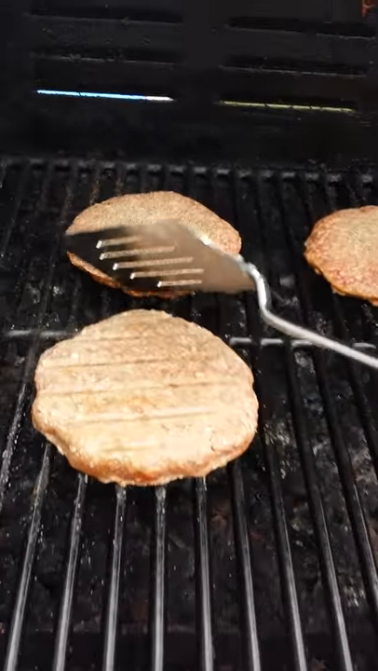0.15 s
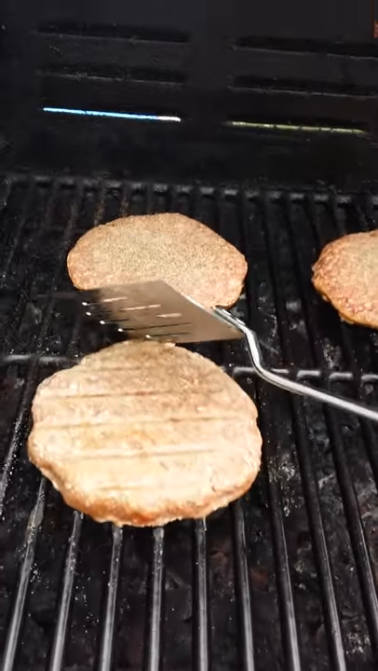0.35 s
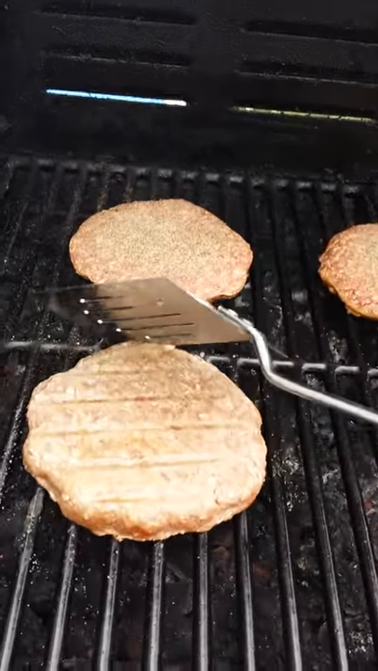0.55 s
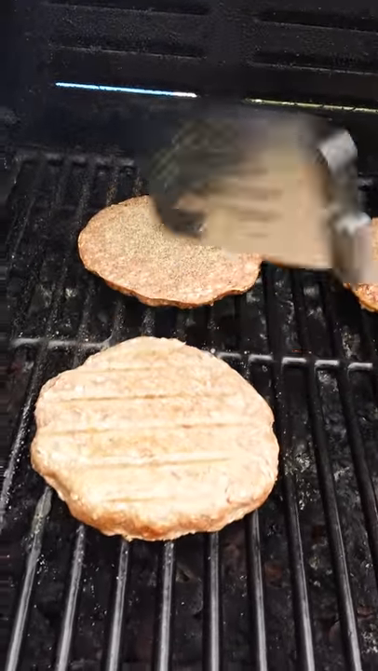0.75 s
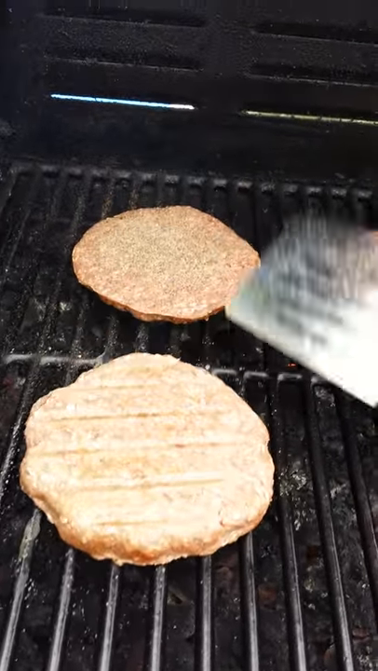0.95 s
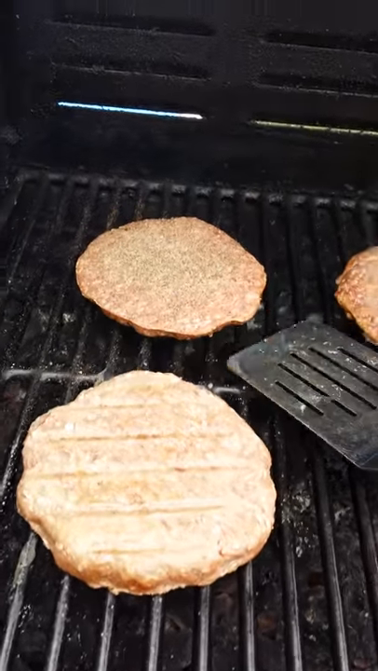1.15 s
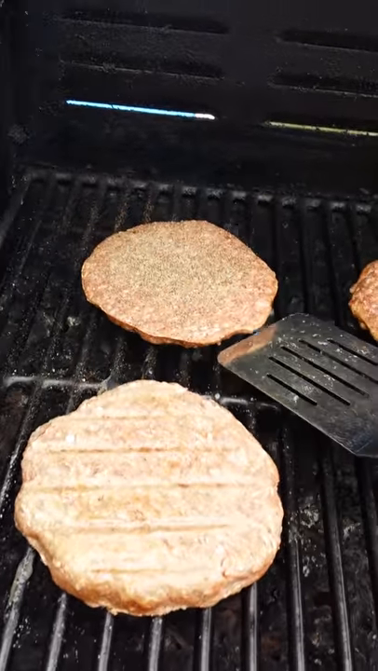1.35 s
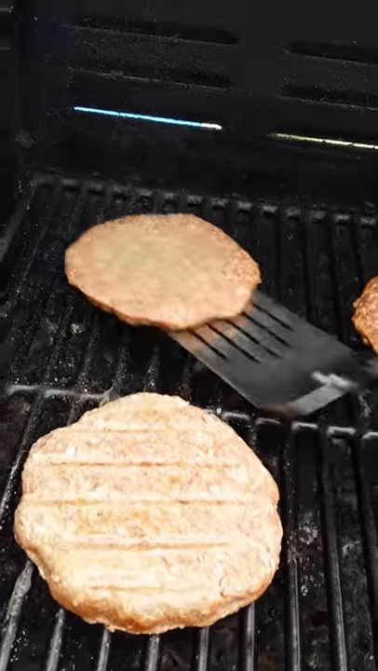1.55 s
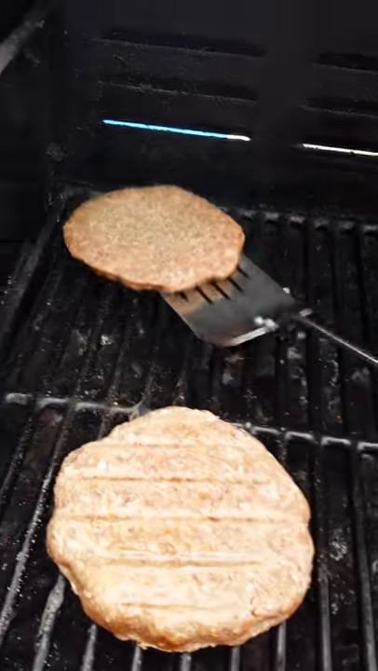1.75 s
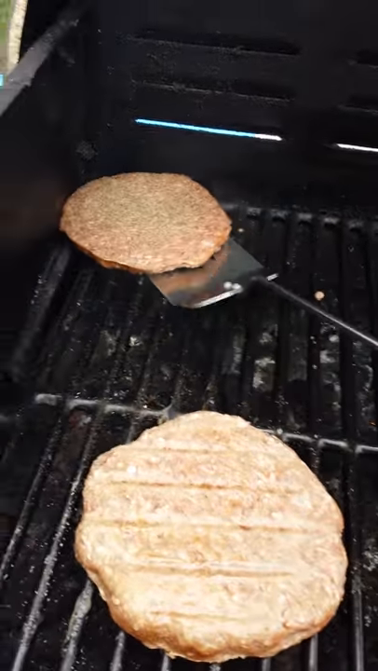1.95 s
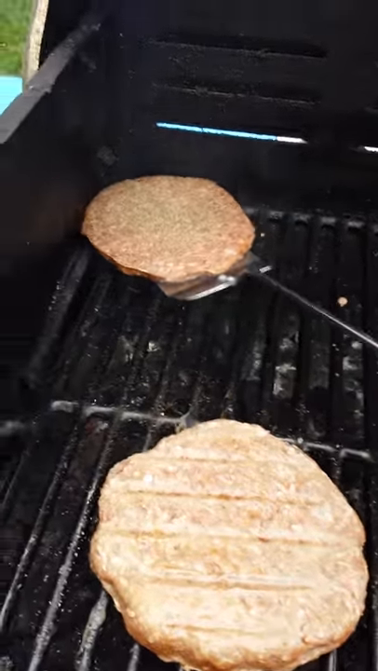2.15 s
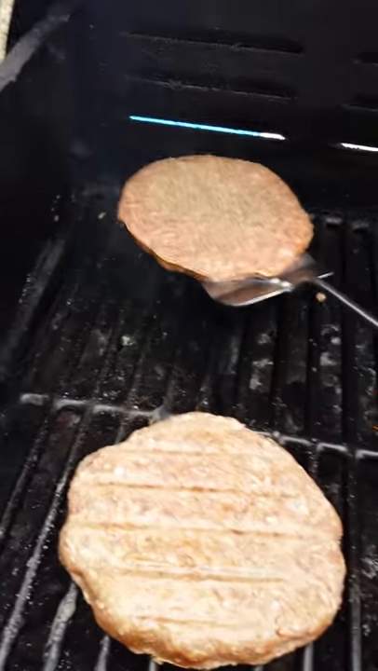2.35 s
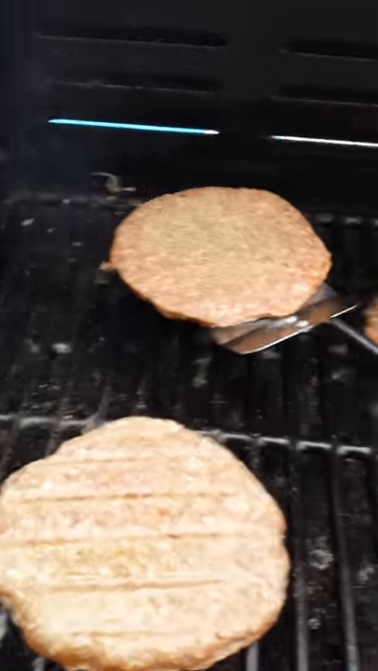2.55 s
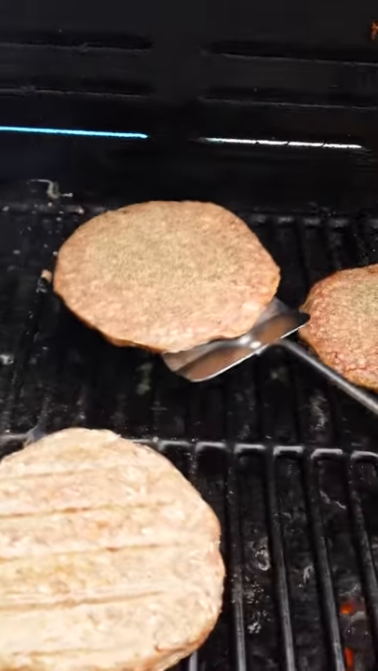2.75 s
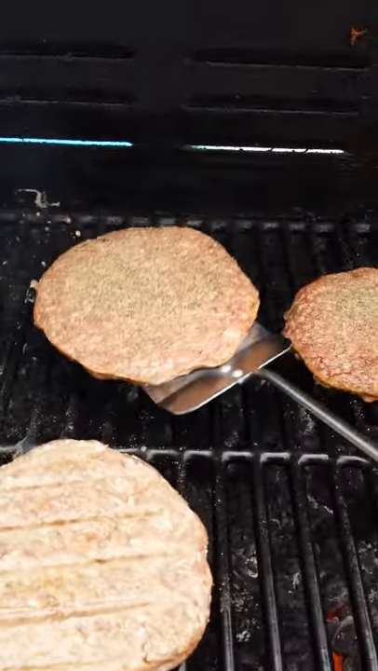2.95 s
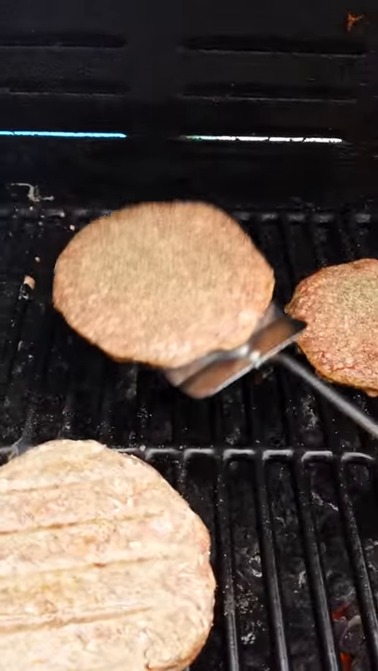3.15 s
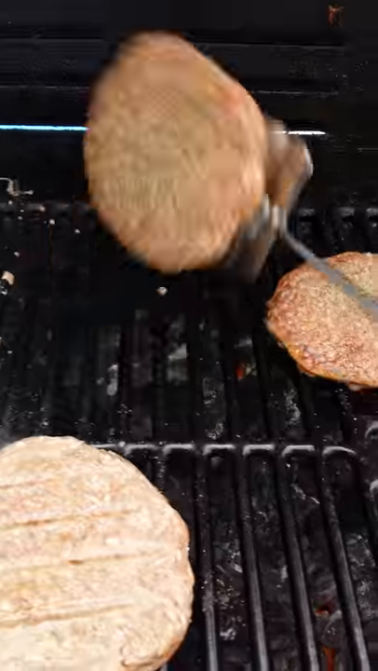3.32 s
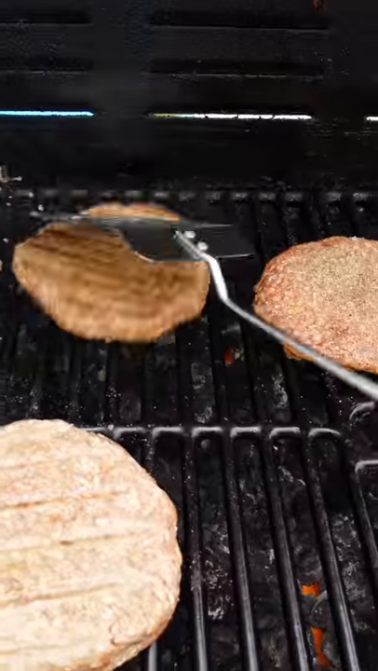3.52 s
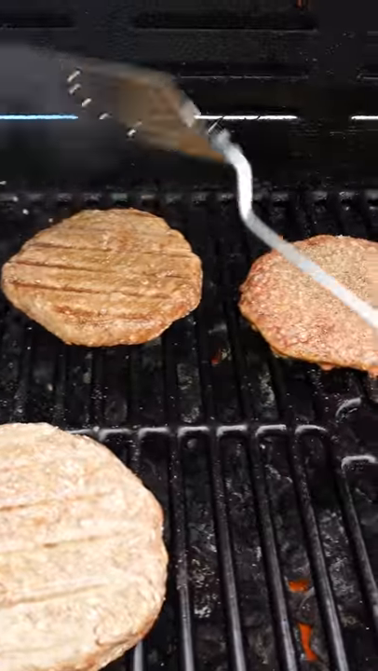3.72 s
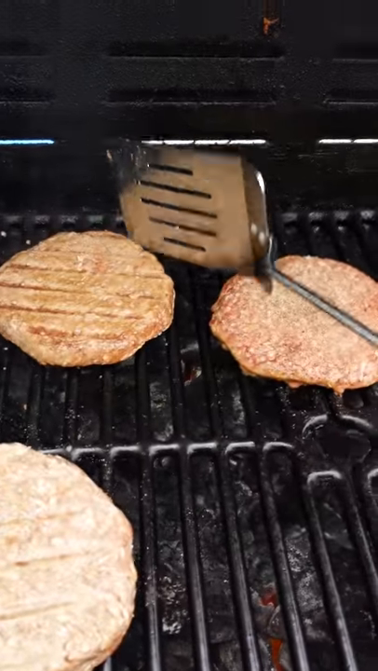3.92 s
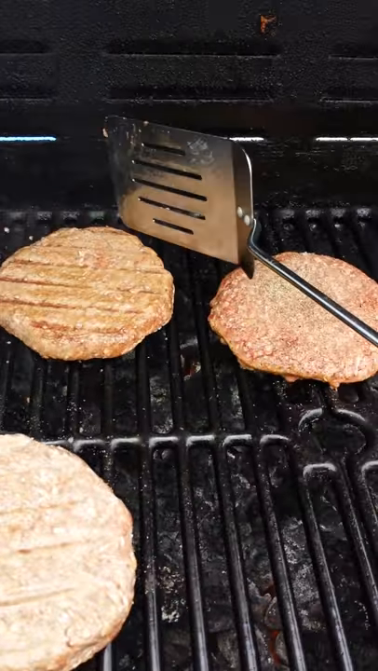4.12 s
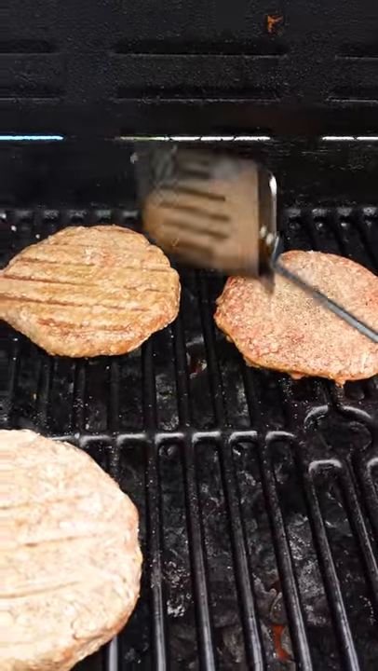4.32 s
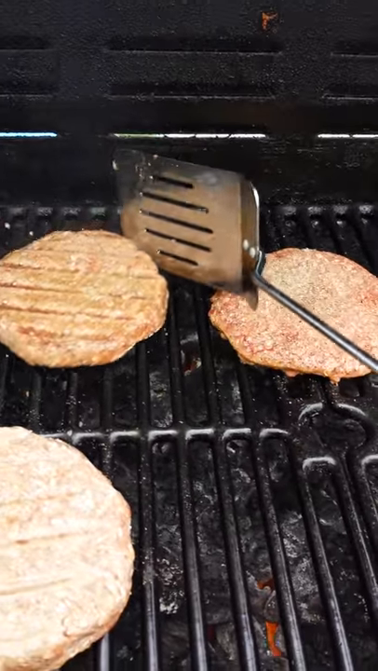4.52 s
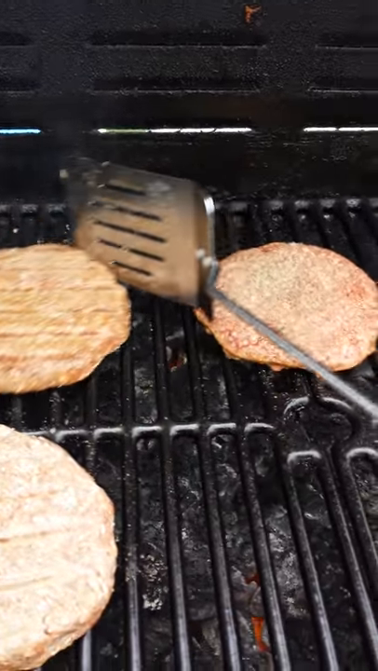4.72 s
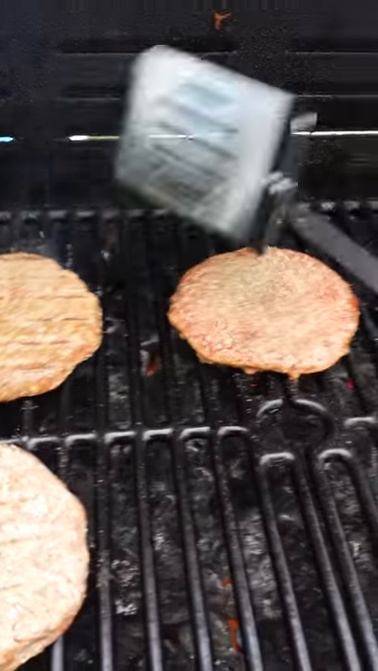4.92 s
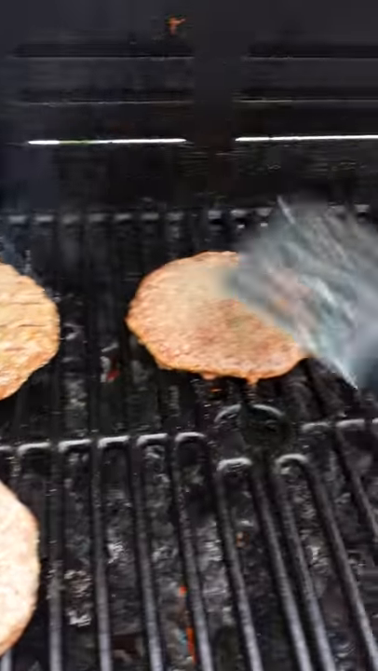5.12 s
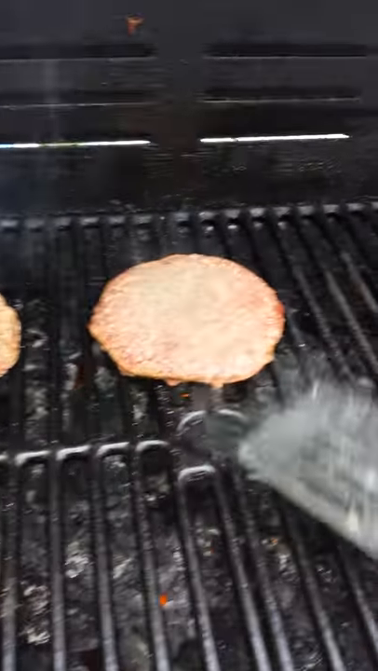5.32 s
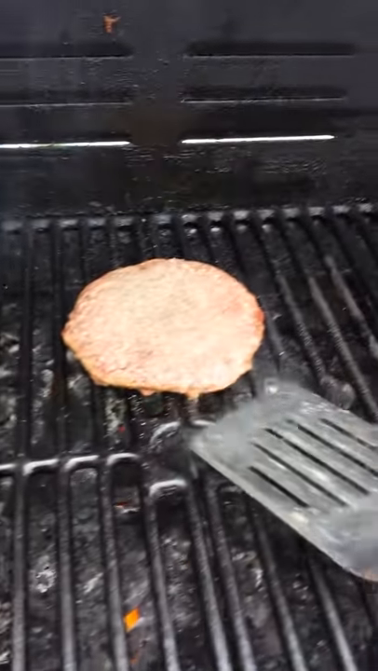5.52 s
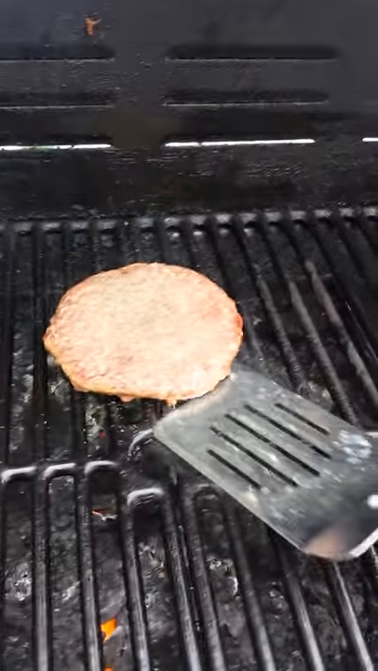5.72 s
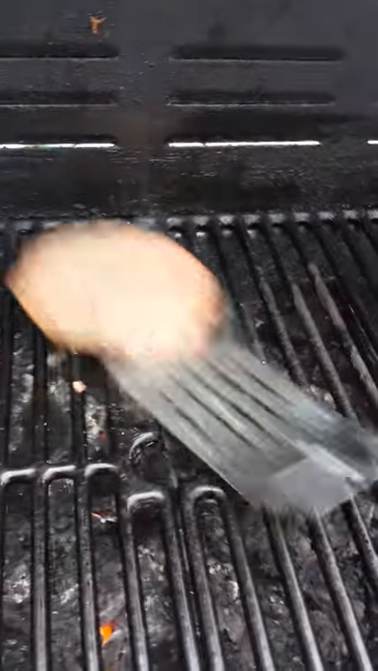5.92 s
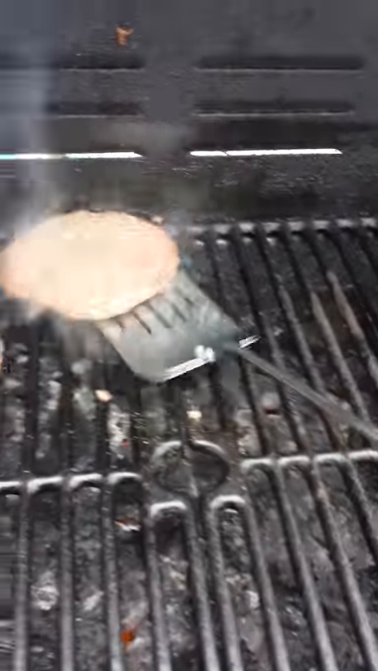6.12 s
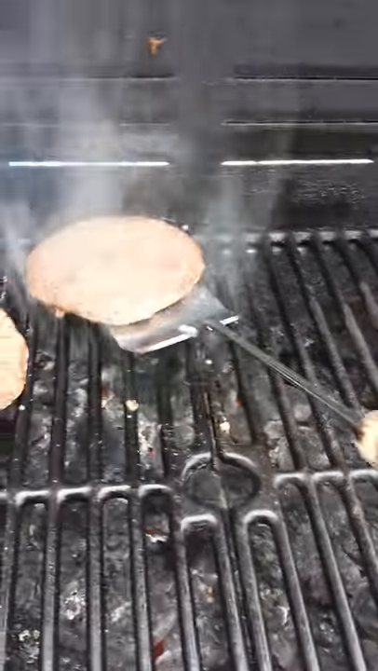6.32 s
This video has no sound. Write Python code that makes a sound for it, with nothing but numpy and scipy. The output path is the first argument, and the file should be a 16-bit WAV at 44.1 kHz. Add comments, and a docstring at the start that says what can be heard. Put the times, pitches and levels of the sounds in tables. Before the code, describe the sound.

Close stereo sound of patties on a gas grill. At first the sizzle is faint; at 0.36 s a bright spatula tap rattles the grate, with a brief scrape until about 0.6. The sizzle rises, small fat spits tick from 0.9, and a light clink comes at 1.2. From 1.25 to 2.1 the blade scrapes and chatters over the bars, harshest near 1.65, ending at 2.15 with a loud ringing clang of loose bars. Steady crackling sizzle and sharp fat pops follow; at 3.6 a turned patty lands with a low, rattling thud and the hiss surges. A small knock and short scrape come at 4.46, then the sizzle dips around 5.1. At 5.46 the spatula knocks and scrapes again, fat snaps at 5.8, and a strong grinding push at 6.0 leads into the fullest sizzle and steam by 6.35. A soft burner roar flutters underneath; the metal firebox adds a short tail.

```python
"""Meat patties sizzle on a gas grill close to a two-port microphone: random bursts and noise shaped in spectrum.
A steel spatula knocks on the grate and slides over the bars: excited modes of blade and grate, with a chatter.
Fat spits in short clicks and puffs; jolts rattle the loose bars, and a turned patty lands with a thud.
The metal firebox adds a decaying tail, and the burners roar softly behind as fluttering low noise."""
import sys
import numpy as np
from scipy import signal
from scipy.fft import rfft, irfft, next_fast_len
from scipy.io import wavfile
from scipy.ndimage import uniform_filter1d, map_coordinates

SR = 44100
rng = np.random.default_rng(int(sys.argv[2]) if len(sys.argv) > 2 else 0)


def materialize(psi):
    """Save the field psi as 16-bit PCM at rate SR to the path in sys.argv[1].

    A 1-D psi becomes a single channel; in a 2-D psi each row is a channel.
    """
    bounded = np.clip(np.atleast_2d(psi).T, -1, 1)
    quanta = np.round(bounded * 32767).astype(np.int16)
    wavfile.write(sys.argv[1], SR, quanta)


N = 280757

# course of the frying: (time [s], sizzle level [dB], steam level [dB], left minus right [dB])
FRYING_COURSE = [(0.0, -43, -58, 1), (0.3, -43.5, -54, -1), (0.57, -40.5, -50, 1), (1.1, -37, -47, 0),
                 (1.24, -31, -39, 4), (1.4, -33.5, -36, 1.5), (2.16, -26.5, -38, 3), (2.35, -29, -46, 0),
                 (2.73, -29, -41, 0.5), (3.42, -29, -50, 2), (3.62, -26, -40, -2), (4.04, -25.5, -37.5, -1),
                 (4.55, -28.5, -42, -1), (5.09, -32.5, -53, -0.5), (5.46, -29, -46, -2),
                 (5.7, -28.5, -33, 1), (6.05, -25.5, -34, 0.5), (6.37, -24.5, -32, 2)]
# spectral shape of the bubbling juice: (frequency [Hz], relative density [dB])
SIZZLE_SPECTRUM = [(710, -33), (1200, -13.5), (1310, -22), (1640, -20), (2430, -10.5), (2920, -10),
                   (3650, -11.5), (5610, -0.5), (7020, 1.5), (9270, -8), (12100, -15.5), (14900, -11.5),
                   (15500, -10)]
# spectral shape of the steam hiss: (frequency [Hz], relative density [dB])
STEAM_SPECTRUM = [(7000, -120), (8500, -23), (10000, -1), (13000, 0), (15500, -0.5)]
# exploding drops of fat: (time [s], strength [dB], left minus right [dB])
FAT_DROPS = [(0.8949, -25, 0.0), (0.9522, -22, -0.5), (1.062, -21, 1.0), (1.1428, -24, 1.5),
             (1.3239, -17, 2.0), (1.5249, -18, 1.0), (2.6474, -12, -3.5), (2.7482, -18, 0.5),
             (2.9362, -15, -2.0), (3.0609, -15, 3.5), (3.1742, -18, 1.0), (3.243, -16, 3.5),
             (3.5498, -15, 0.5), (4.3384, -20, -0.5), (4.8134, -18, -1.0), (4.9182, -20, -2.5),
             (5.7823, -12, -1.0), (5.8242, -11, -1.0)]
# blade on the bars: (time [s], strength [dB], favoured mode [Hz], its lead over the other modes [dB],
# chatter t60 [s], grip [0 loose to 1 held down], left minus right [dB])
BLADE_KNOCKS = [(0.3573, -21.5, 5830, 12, 0.11, 0.31, 4.5), (.376, -29.5, 7880, 17, .02, .05, -3),
                (.4194, -29, 5870, 12, .089, 0.38, 8.5), (0.552, -44, 6375, 16, .05, .1, 10),
                (0.5898, -31.5, 5734, 5.5, 0.096, .1, 2.5), (1.1907, -20, 6830, 10.5, 0.13, 0.14, 2),
                (1.2106, -29, 6830, 11, .069, .1, -11), (1.574, -22.5, 4114, 17, 0.13, 0.87, 14.5),
                (1.6122, -14, 6200, 9.5, .12, 0.55, 0), (1.6344, -16, 6830, 11.5, 0.082, .5, 0),
                (1.6596, -18, 6375, 11, 0.16, 0.84, 5), (1.723, -22.5, 6375, 10, 0.062, 0.85, 12),
                (1.7966, -23, 6200, 14, 0.29, 0.7, 4), (1.8487, -29, 6375, 10, .1, 0.63, 13),
                (1.9098, -28, 4630, 14, .13, .6, 13.5), (2.151, -20, 6200, 6, .15, 0.8, 0),
                (4.4568, -23, 6800, 26, .05, 0.14, -1), (5.463, -14.5, 6430, 13, 0.11, 0.55, 0.5),
                (5.5331, -23.5, 5630, 12, 0.33, 0.53, 0.5), (5.6434, -27, 5640, 11, .087, 0.66, -2),
                (5.666, -27.5, 5930, 12, 0.1, 0.62, 10), (5.9807, -22, 7550, 10, 0.17, .4, 8),
                (6.0275, -19, 5620, 16, 0.078, 0.33, -2), (6.0541, -17, 5655, 9, 0.5, .8, 2.5),
                (6.085, -20, 5930, 14, .14, 0.27, -1), (6.149, -27, 6375, 16, .064, 0.54, 1)]
# modes of the spatula blade: (frequency [Hz], level [dB], t60 before the grip alters it [s])
BLADE_MODES = [(2363, -20, .22), (3470, -20, .2), (3925, -10, .12), (4114, -12, .15), (4670, -14, .15),
               (4810, -5, .18), (5045, -10, .2), (5655, -9, .16), (5746, -5, .5), (5965, -8, .15),
               (6200, -6, .3), (6375, -6, .13), (6640, -11, .15), (6830, -5, .22), (7300, -7, .12),
               (7585, -8, .08), (7800, -6, .3), (7932, -8, .4), (8430, -12, .1), (9030, -14, .1)]
# strokes along the bars, one list each: (time [s], blade friction [dB], grate shaking [dB], loudest grate [Hz])
BLADE_STROKES = [
    [(0.4, -24, -36, 835), (0.438, -33, -44.5, 795), (0.494, -56, -50, 714), (0.604, -27.5, -38.5, 660),
     (0.634, -51, -47, 530), (0.72, -55, -59, 326)],
    [(1.23, -29.5, -48, 499), (1.332, -31.5, -39.5, 855), (1.52, -34.5, -48, 600), (1.6, -26, -36.5, 1250),
     (1.672, -17.5, -33.5, 850), (1.7, -28, -35.5, 800), (1.87, -25.5, -34, 600), (1.95, -30, -34, 360),
     (2.14, -39, -40, 480)],
    [(4.49, -32, -38, 583), (4.554, -31, -39.5, 367), (4.66, -64, -58, 377)],
    [(5.49, -28, -36.5, 393), (5.626, -23.5, -31.5, 388), (5.738, -27.5, -37.5, 844),
     (5.804, -28, -36, 470), (5.936, -34.5, -45, 351), (5.99, -15, -27.5, 370), (6.09, -18, -39, 820),
     (6.15, -22.5, -36, 744), (6.366, -29, -48.5, 450)],
]
# modes of grate bars and firebox panels: (frequency [Hz], width [Hz], level [dB])
GRATE_MODES = [(113.4, 24, -10), (169.8, 16.3, -6), (245, 45, -6), (324.8, 15.5, 1.5), (370, 15, -0.5),
               (397.3, 6.4, 0.5), (441.7, 15, -1), (563, 67, -10), (716.4, 53, -3.5), (826.5, 20.5, 0.5),
               (1010, 140, -11.5), (1230, 49, -2.5), (1383, 66, -5.5), (1685, 39, -1), (2050, 210, -10),
               (2424, 55, -6), (2700, 260, -11.5)]
# pushes on the grate: (time [s], strength [dB], rattle t60 near 400 Hz [s], rise time constant [s],
# centre [Hz], reach [octaves])
GRATE_JOLTS = [(.357, -5.5, 0.58, 0.0011, 880, 0.41), (.36, -20.5, 0.7, 0.0025, 396, 0.45),
               (0.639, -18, .25, .03, 170, .3), (1.188, -17.5, 0.44, 0.0053, 960, 2.8),
               (2.149, 2.5, 0.72, 0.00017, 875, 1.46), (2.16, -7, 1.23, 0.014, 430, 0.49),
               (3.625, -6.5, 0.7, 0.0054, 186, 1.77), (4.457, -9.5, 0.34, 0.0019, 1110, 1.55),
               (5.464, -6.5, 0.18, 0.003, 376, 1.7), (5.962, -2, 0.16, 0.0041, 367, 0.28)]
# decay of the firebox: (frequency [Hz], t60 [s])
FIREBOX_DECAY = [(200, 0.47), (1500, 0.17), (6000, 0.034), (14000, 0.046)]
# course of the gas flames: (time [s], level [dB])
FLAME_COURSE = [(0.0, -55), (0.4, -56), (1.63, -46.5), (2.53, -50), (3.26, -52.5), (3.81, -47.5),
                (4.64, -48.5), (5.25, -54.5), (5.71, -41), (6.37, -49.5)]
# spectral shape of the burner roar: (frequency [Hz], relative density [dB])
BURNER_SPECTRUM = [(13, -63), (22, -35), (60, -9.5), (118, -5), (166, -5), (404, -15.5), (436, -17),
                   (808, -9), (1040, -17), (1210, -17.5), (1410, -18), (2200, -21), (2860, -55),
                   (4840, -120)]
# likeness of the two channels of a spread source: (frequency [Hz], correlation [0 to 1])
CHANNEL_LIKENESS = [(40, 0.91), (150, 1), (350, 1), (1000, 0.13), (3000, 0.14), (6000, 0.15), (14000, 0.04)]
# colour of the microphone ports: (frequency [Hz], left minus right [dB])
PORT_COLOUR = [(30, 8), (120, 0), (350, 5.5), (700, -0.5), (1400, 1), (2800, 3.5), (5600, 4), (11000, -7),
               (15000, -2)]

LOOSE_RING_DB, GRIP_MUTES_DB = 2, 8.5  # ring gain for a loose blade, and what a full grip takes off
LOOSE_RING_S, HELD_RING_S = 0.06, 0.025  # time before the ring is choked, for a loose and a held blade
RUBBED_BLADE_HZ, DRONE_DB = 6000, -51  # the modes that a stroke favours; the firebox drone during a stroke
SPIT_CLICK_DB = 13  # click height before the strength of the drop
FIREBOX_DB = -11.0  # gain of the firebox tail
LAG_S, TOP_HZ = 0.00046, 15550  # delay of the left port behind the right; band limit


def frying():
    """Bubble noise: random bursts of juice over a smoother hiss of steam, under one common modulation."""
    sizzle_db, steam_db, pan_db = curves(FRYING_COURSE)
    surge_db = 0.4 * wobble(9) + 0.9 * wobble(40)
    bubbles = 1.03 * grains(per_s=900, spread_db=3.5) + rng.standard_normal((2, N))
    steam = 0.29 * grains(per_s=830, spread_db=3.5) + rng.standard_normal((2, N))
    sizzle = amp(sizzle_db + surge_db) * pair(bubbles, SIZZLE_SPECTRUM)
    hiss = amp(steam_db + surge_db) * pair(steam, STEAM_SPECTRUM)
    return (sizzle + hiss) * amp([pan_db / 2, -pan_db / 2])


def knocks():
    """Modal excitation: a contact rings the blade, favours modes near one frequency and chatters briefly."""
    ring, chatter = np.zeros((2, N + SR)), np.zeros((2, N + SR))
    t = np.arange(SR // 5) / SR
    hz, level_db, t60 = np.transpose(BLADE_MODES)[:, :, None]
    turning = np.exp(2j * np.pi * hz * t)
    for s, db, best_hz, lead_db, chatter_s, grip, pan_db in BLADE_KNOCKS:
        at = round(s * SR)
        gain = sides(pan_db) * amp(db)

        favour_db = lead_db * np.exp(-((hz - best_hz) / 150) ** 2)
        decay_s = t60 * np.clip(1.3 - grip, .1, 2)
        decay = amp(level_db + favour_db - 60 * t / decay_s)
        # held on the bars the blade buzzes: ragged level and phase
        knots = np.repeat(rng.standard_normal((len(hz), 40)), len(t) // 40 + 1, axis=1)[:, :len(t)]
        buzz = np.exp(1.1 * grip * (1j + 0.73) * uniform_filter1d(knots, size=120))
        # modes radiate differently to each port
        aim_db = rng.normal(0, 1.4, len(hz)) + rng.normal(0, 0.6, (2, len(hz)))
        aim = amp(aim_db) * np.exp(2j * np.pi * rng.random((2, len(hz))))
        modes = (aim @ (decay * buzz * turning)).imag
        # the ring is choked after a short time, sooner when the blade is held
        free_s = LOOSE_RING_S + (HELD_RING_S - LOOSE_RING_S) * grip
        choke = amp(-60 * np.clip(t - free_s, 0, None) / .06)
        ring_onset = 1 - np.exp(-t / (0.00031 + .004 * grip ** 2))
        ring_gain = amp(LOOSE_RING_DB - GRIP_MUTES_DB * grip)
        ring[:, at:at + len(t)] += gain * ring_gain * modes * choke * ring_onset

        loose_burst = 1.7 * (1 - np.clip(grip, 0, 1)) ** 2 * amp(-60 * t / 0.018)
        burst = amp(-60 * t / max(chatter_s, .01)) + loose_burst
        # a dragged blade meets the bar more softly
        burst = burst * (1 - np.exp(-t / (0.00021 + .007 * grip ** 2)))
        chatter[:, at:at + len(t)] += gain * burst * rng.standard_normal((2, len(t)))
    chatter_colour = resonances([(4620, 3500, 7.5), (7350, 2500, 10.5), (11500, 10600, -2)])
    return ring[:, :N] + filtered(chatter[:, :N], chatter_colour)


def slides():
    """Friction excitation: grit catches the blade edge in clumps and drives the damped blade and the grate."""
    rub_db, shake_db, grate_hz = curves(np.vstack(BLADE_STROKES))
    t = np.arange(N) / SR
    strokes = sum((t > rows[0][0]) * (t < rows[-1][0]) * 1. for rows in BLADE_STROKES)
    touching = uniform_filter1d(strokes, SR // 50)  # soft edges
    clumps = amp(2.45 * wobble(45) + 1.0 * wobble(120))
    grit = clumps * (grains(per_s=2500, spread_db=2.0) + 0.38 * rng.standard_normal((2, N)))

    # pressed on the bars, the modes widen and even out
    held = [(hz, 18 / t60, .75 * db) for hz, db, t60 in BLADE_MODES]
    rubbed_hz = np.full(N, RUBBED_BLADE_HZ)
    blade = shifting(filtered(grit, resonances(held)), rubbed_hz,
                     octaves=0.18, lift_db=3.0, flicker_db=3.5, size=256)

    push = pair(clumps * rng.standard_normal((2, N)), [(100, -9.5), (3000, 0.0)])
    bars = filtered(push, resonances(GRATE_MODES))
    grate = shifting(bars, grate_hz, octaves=0.36, lift_db=6.0, flicker_db=4.5, size=2048)

    hum = pair(rng.standard_normal((2, N)), [(100, 0), (300, 0)])
    drone = unit(filtered(hum, resonances(GRATE_MODES[1:2])))
    return touching * (amp(rub_db) * blade + amp(shake_db) * grate + amp(DRONE_DB) * drone)


def spits():
    """Impulsive radiation: a drop of fat explodes as a click inside a decaying puff of noise."""
    out, t = np.zeros((2, N + SR)), np.arange(SR // 50) / SR
    for s, db, pan_db in FAT_DROPS:
        puff = 1.1 * rng.standard_normal((2, len(t))) * amp(-60 * t / .02)
        puff[:, SR // 4000] += amp(SPIT_CLICK_DB)  # a quarter of a millisecond in
        out[:, round(s * SR):][:, :len(t)] += amp(db) * sides(pan_db) * puff
    return filtered(out[:, :N], resonances([(6600, 3500, -2), (13000, 6000, -9)]))


def jolts():
    """Frequency-dependent damping: a push, then loose bars rattle on and the high modes die first."""
    out, u = np.zeros((2, N + SR)), np.arange(SR) / SR
    for s, db, rattle_s, rise_s, centre_hz, octaves in GRATE_JOLTS:
        noise = pair(rng.standard_normal((2, SR)), [(50, 0), (5000, 0)])
        hz, t, z = signal.stft(noise, SR, nperseg=512)
        hz = hz[:, None] + 30  # keeps the logarithm finite
        reach_db = np.maximum(-9 * (np.log2(hz / centre_hz) / octaves) ** 2, -30)
        fade_db = -60 * t / max(rattle_s, .05) * (hz / 400) ** 0.28
        rattle = signal.istft(z * amp(reach_db + fade_db), SR, nperseg=512)[1][:, :SR]
        onset = 1 - np.exp(-u / max(rise_s, 1e-4))
        push = 1 + 3.5 * amp(-60 * u / 0.018)
        out[:, round(s * SR):][:, :SR] += amp(db) * rattle * onset * push
    return filtered(out[:, :N], resonances(GRATE_MODES))


def firebox(x):
    """Reverberation: the open metal box answers with a noise tail, each frequency dying at its own speed."""
    hz, t, z = signal.stft(rng.standard_normal((2, SR // 2)), SR, nperseg=256)
    fade = amp(-60 * t / along(FIREBOX_DECAY, hz)[:, None])
    tail = signal.istft(z * fade, SR, nperseg=256)[1]
    late = np.pad(x, ((0, 0), (120, 0)))  # delay in samples
    return signal.fftconvolve(late, tail / np.linalg.norm(tail[0]), axes=1)[:, :N]


def burners():
    """Combustion noise: the low roar of the gas flames is coloured noise with a fluttering level."""
    flutter_db = 1.74 * wobble(3.19) + 1.5 * wobble(17)
    return amp(curves(FLAME_COURSE)[0] + flutter_db) * pair(rng.standard_normal((2, N)), BURNER_SPECTRUM)


def amp(db):
    """Decibel law: level to amplitude ratio."""
    return 10 ** (np.asarray(db) / 20)


def unit(x):
    """Normalisation to a root mean square of one."""
    return x / np.sqrt(np.mean(x ** 2) + 1e-20)


def along(points, hz):
    """Logarithmic pitch scale: interpolates (frequency [Hz], value) points on it."""
    f, v = np.transpose(points)
    return np.interp(np.log(hz + 1), np.log(f + 1), v)


def curves(rows):
    """Linear interpolation in time: one value per sample for each column after the time."""
    s, *cols = np.transpose(rows)
    return [np.interp(np.arange(N) / SR, s, c) for c in cols]


def wobble(rate):
    """Slow random modulation: a smooth curve through rate knots a second."""
    knots = rng.standard_normal(int(N * rate / SR) + 4)
    return map_coordinates(knots, [np.arange(N) * rate / SR])


def filtered(x, response):
    """Linear filtering: the spectrum of x times a complex response of frequency."""
    n = x.shape[-1]
    m = next_fast_len(n + SR // 4)
    return irfft(rfft(x, m) * response(np.fft.rfftfreq(m, 1 / SR)), m)[..., :n]


def resonances(modes):
    """Modal superposition: causal response of (frequency [Hz], width [Hz], level [dB]) modes, signs alternating."""
    def response(f):
        return sum((-1) ** k * amp(db) * 1j * f * w / (c * c - f * f + 1j * f * w)
                   for k, (c, w, db) in enumerate(modes))
    return response


def grains(per_s, spread_db):
    """Shot noise: two unrelated streams of random impulses, a few large, many small."""
    out, at = np.zeros(2 * N), rng.integers(0, 2 * N, int(2 * per_s * N / SR))
    size_db = spread_db * np.minimum(rng.exponential(size=len(at)), 2.5)
    out[at] = rng.choice([-1, 1], len(at)) * amp(size_db)
    return unit(out.reshape(2, N))


def pair(two, spectrum):
    """Partial coherence: two unrelated signals, coloured and mixed so that the channels agree in the bass only."""
    def mid_side(hz):
        turn = np.arccos(np.clip(along(CHANNEL_LIKENESS, hz), 0, 1)) / 2
        return amp(along(spectrum, hz)) * [np.cos(turn), np.sin(turn)]
    mid, side = filtered(two, mid_side)
    return unit(np.array([mid + side, mid - side]))


def sides(pan_db):
    """Level panning: half the difference goes to each channel."""
    return amp([[pan_db / 2], [-pan_db / 2]])


def shifting(x, centre_hz, octaves, lift_db, flicker_db, size):
    """Moving excitation: lifts modes near a given centre curve and lets all of them flicker at random."""
    hz, t, z = signal.stft(x, SR, nperseg=size)
    centre = centre_hz[np.minimum((t * SR).astype(int), N - 1)]
    lift = lift_db * np.exp(-(np.log2((hz[:, None] + 1) / centre) / octaves) ** 2)
    rough = rng.standard_normal(lift.shape)
    flicker = unit(uniform_filter1d(uniform_filter1d(rough, size=3, axis=0), size=3, axis=1))
    return unit(signal.istft(z * amp(lift + flicker_db * flicker), SR, nperseg=size)[1][:, :N])


def scene():
    """Superposition: all sources add, and the firebox answers the blade, its strokes and the spits."""
    struck = knocks() + slides() + spits()
    return frying() + struck + jolts() + amp(FIREBOX_DB) * firebox(struck) + burners()


def record(dry):
    """Two-port reception: the left port hears later and with another colour, below a band limit."""
    def ports(hz):
        tilt = amp(np.outer([.5, -.5], along(PORT_COLOUR, hz)))
        lag = np.exp(-1j * np.pi * np.outer([1, -1], hz) * LAG_S)  # half the delay on each side
        return tilt * lag * (hz < TOP_HZ)
    return filtered(dry, ports)


dry = scene()
out = record(dry)
materialize(out)
```